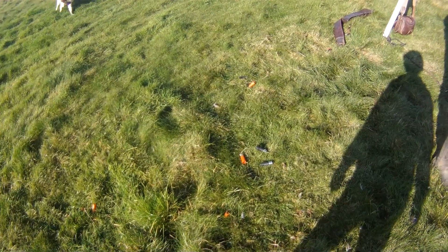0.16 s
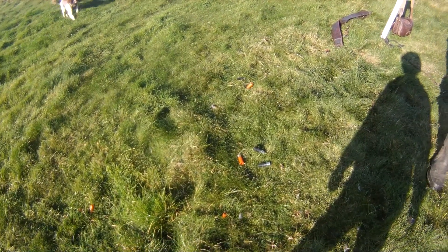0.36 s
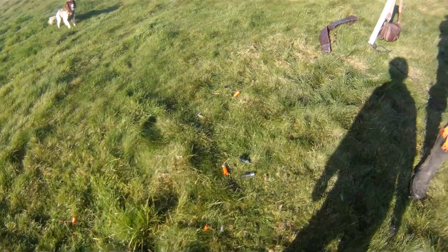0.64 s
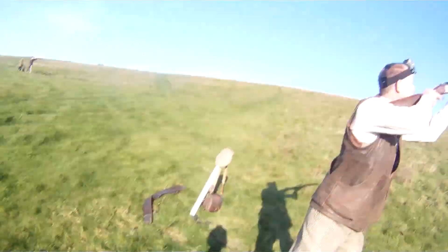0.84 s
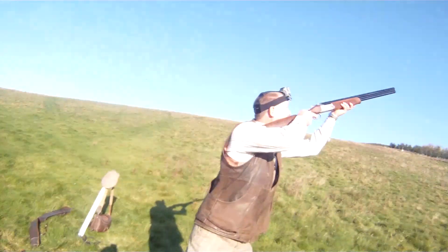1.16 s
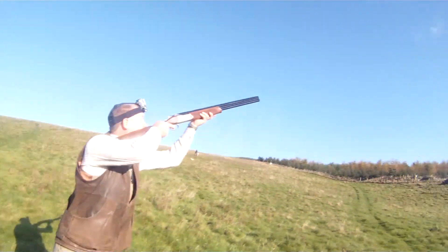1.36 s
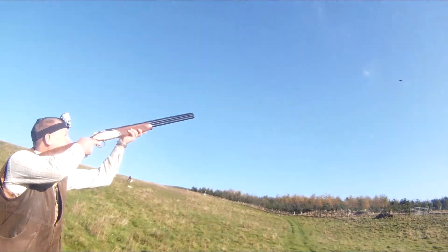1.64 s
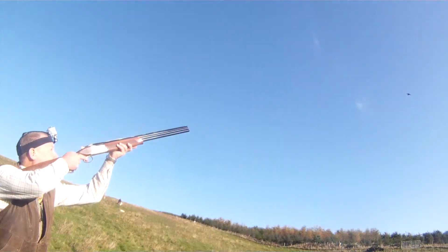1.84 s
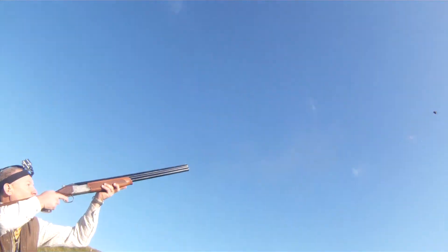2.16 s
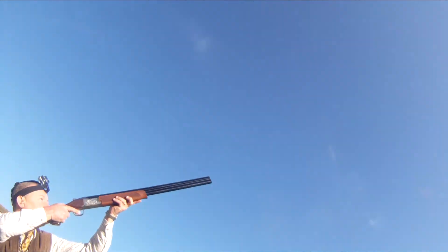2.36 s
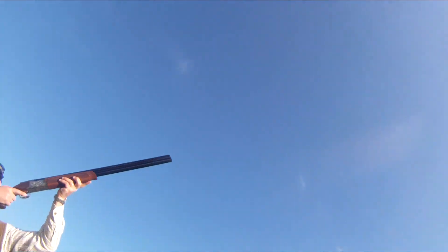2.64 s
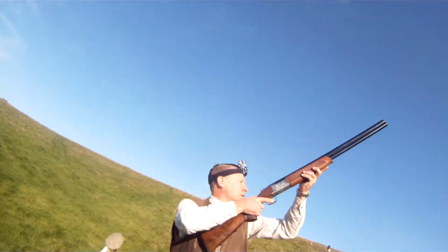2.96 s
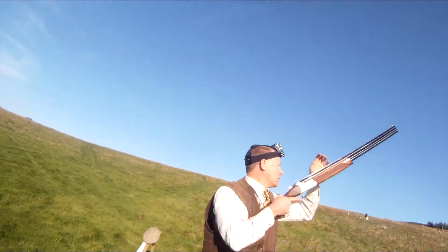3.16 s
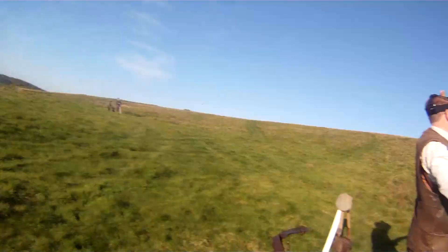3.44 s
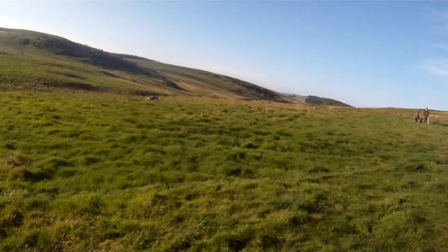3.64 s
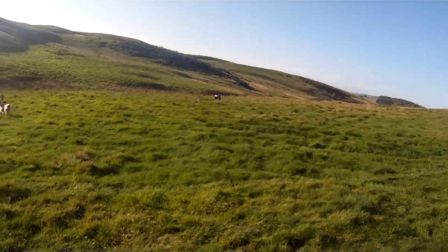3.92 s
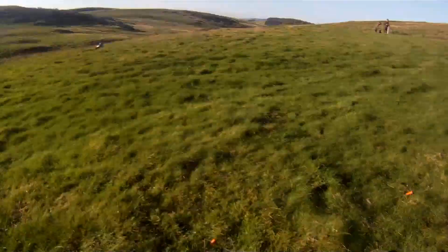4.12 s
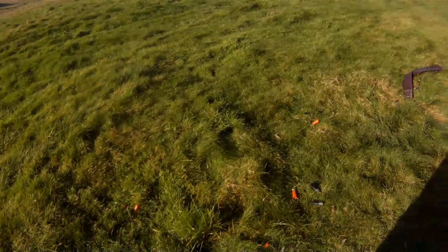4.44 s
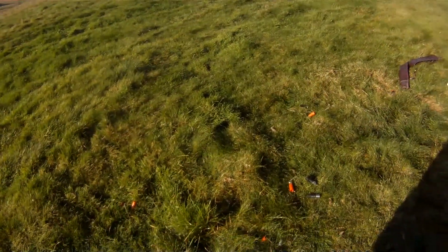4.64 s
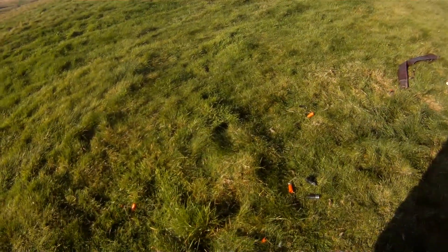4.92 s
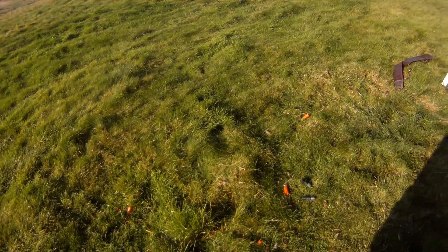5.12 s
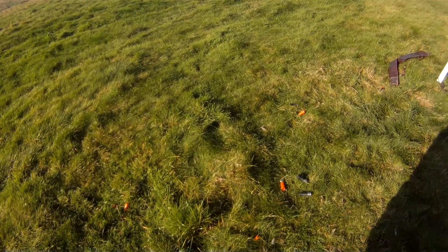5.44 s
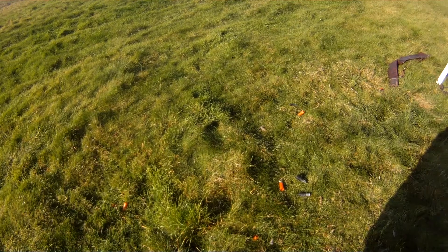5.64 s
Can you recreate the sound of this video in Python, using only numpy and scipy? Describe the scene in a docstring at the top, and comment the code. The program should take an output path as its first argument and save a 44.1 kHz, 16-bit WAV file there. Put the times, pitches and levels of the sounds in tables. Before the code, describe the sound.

Close shotgun fire outdoors: one crack, then two in quick succession, with a short ringing, rolling echo and small clicks afterwards.

```python
"""Shotgun cracks on an open grassy hillside, heard by a small hand-held camera beside the shooter.
Each blast rings the camera's housing and overloads its microphone; slopes scatter back a grainy roll.
Light wind bumps the microphone, clothes rustle, small things click, air whistles faintly, a bird chirps.
The recorder's 12 kHz sample-and-hold adds a glassy top."""
import sys
import numpy as np
from scipy import signal
from scipy.fft import rfft, irfft, next_fast_len
from scipy.io import wavfile

SR = 44100
rng = np.random.default_rng(int(sys.argv[2]) if len(sys.argv) > 2 else 0)


def wav_out(sig):
    """Save sig, one row per channel (or a flat mono array), as 16-bit PCM at SR to the path in sys.argv[1]."""
    wavfile.write(sys.argv[1], SR, np.round(np.clip(np.atleast_2d(sig).T, -1, 1) * 32767).astype(np.int16))


N = 254811
TIME = np.arange(N) / SR
AGE = np.arange(8192) / SR  # s since onset

# blasts: t/s, level/dB, focus f/Hz, bounce lag/ms, bounce/dB re level, gas/dB re level, gas length/ms,
# thump/dB, bark/dB, tail/dB, tail decay/ms
SHOTS = [(0.9739, 6.5, 1474, 1.347, 2.5, -15.5, 2.6, -35, -8.5, -31.5, 19.6),
         (1.7146, 4, 2130, 2.49, -3.5, -19.5, 1.53, -28.5, -24, -40.5, 34.4),
         (1.919, 14, 1150, 2.2, -3, -16, 3, -19, -11, -32.5, 40),
         (1.9449, 7.5, 2042, 1.50, 2.5, -2.5, 3.7, -29.5, -2, -24, 12.3)]
# housing modes: f/Hz, level/dB, t60/s
HOUSING_MODES = [(1230, -12, 0.018), (1366, -10.5, 0.011), (1740, -2, .012), (2020, -1.5, 0.012),
                 (2354, 3.5, .014), (2910, -8, 0.023), (3090, -14, .016), (3490, -6, 0.012),
                 (4300, -14, .009), (5320, -17, .009)]


def undb(db):
    """Decibels to gain."""
    return 10 ** (np.asarray(db) / 20)


def add(out, t_s, sound):
    """Mix sound in at t_s."""
    i = int(t_s * SR)
    out[i:i + len(sound)] += sound[:N - i]


def colour(x, spectrum):
    """Shape x by (f/Hz, level/dB) points; rms 1."""
    hz, db = np.transpose(spectrum)
    size = next_fast_len(len(x))
    bins_hz = np.maximum(np.fft.rfftfreq(size, 1 / SR), 1)
    gain = undb(np.interp(np.log(bins_hz), np.log(hz), db))
    y = irfft(rfft(x, size) * gain, size)[:len(x)]
    return y / np.std(y)


def burst(spectrum, decay_ms):
    """Coloured noise: instant onset, exponential decay."""
    return colour(rng.standard_normal(len(AGE)), spectrum) * np.exp(-1000 * AGE / decay_ms)


def grains(spectrum, rate_hz, spread_db):
    """Noise in short packets of uneven size; rms 1."""
    knots = rng.standard_normal(N)
    size_db = spread_db * np.interp(TIME * rate_hz, np.arange(N), knots)
    return colour(rng.standard_normal(N) * undb(size_db), spectrum)


def resonance(x, hz, width_hz):
    """Band-pass, unity gain at centre."""
    return signal.lfilter(*signal.iirpeak(hz, hz / width_hz, fs=SR), x)


def envelope(start_s, hold_s, rise_s, fall_s):
    """Exponential rise until start_s, hold, exponential fall."""
    age = TIME - start_s
    return np.exp(np.minimum(age, 0) / rise_s - np.maximum(age - hold_s, 0) / fall_s)


def swells(rows):
    """Gaussian gain bumps from (centre t/s, half length/s, level/dB)."""
    return sum(undb(db) * np.exp(-((TIME - t_s) / half_s) ** 2) for t_s, half_s, db in rows)


def breeze(wind_db=-1, calm_db=-66, swing_db=-58.5, hiss_db=-62):
    """Calm air, the camera's swing and gusts buffet the microphone over a faint hiss."""
    # gusts: centre t/s, half length/s, level/dB
    gusts = [(.6, .06, -49), (1.27, 0.16, -53.5), (2.17, 0.084, -50.5), (2.775, 0.032, -50),
             (3.31, 0.039, -53), (4.085, .05, -48.5)]
    # buffet spectrum: f/Hz, level/dB
    wind_spectrum = [(7.1, -28.5), (12, 0.5), (49, -2.5), (65, -7), (97, -17), (177, -22.5), (220, -25.5),
                     (300, -23.5), (390, -53.5), (660, -120)]
    # air hiss spectrum: f/Hz, level/dB
    air_spectrum = [(18, -30.5), (30, -4.5), (57, -2.5), (86, -10.5), (128, -5), (252, -10.5), (321, -11.5),
                    (708, -16.5), (2170, -20), (2700, -21.5), (3520, -24), (4480, -24.5), (5700, -29),
                    (7410, -64.5), (12500, -120)]
    swing = undb(swing_db) * envelope(start_s=0.58, hold_s=3.45, rise_s=0.082, fall_s=0.082)
    flow = np.sqrt(undb(calm_db) ** 2 + swing ** 2 + swells(gusts) ** 2)
    buffets = undb(wind_db) * flow * grains(wind_spectrum, rate_hz=22, spread_db=2)
    return buffets + undb(hiss_db) * grains(air_spectrum, rate_hz=27, spread_db=1.15)


def clothes(trim_db=-1):
    """Cloth rubs with each movement."""
    # movements: t/s, hold/s, level/dB
    moves = [(0.603, 0.15, -49), (3.279, 0.081, -60), (3.687, 0.042, -60.5), (3.897, .005, -62),
             (5.662, 0.068, -56.5)]
    # cloth spectrum: f/Hz, level/dB
    spectrum = [(180, -54), (300, -13), (388, -17.5), (673, -24), (698, -11.5), (789, -15), (860, -18.5),
                (1130, -8), (1290, -9.5), (2050, -2), (2560, -13.5), (3040, -16), (3740, -11), (4170, -31),
                (5600, -30), (7280, -65), (12300, -120)]
    motion = sum(undb(db) * envelope(t_s, hold_s, rise_s=.035, fall_s=.04) for t_s, hold_s, db in moves)
    return undb(trim_db) * motion * grains(spectrum, rate_hz=400, spread_db=3)


def housing():
    """Impulse response of the housing round the microphone; peak 1."""
    hz, db, t60_s = np.transpose(HOUSING_MODES)[:, :, None]
    modes = undb(db) * np.cos(2 * np.pi * hz * AGE) * np.exp(-np.log(1000) * AGE / t60_s)
    ring = modes.sum(axis=0)
    return ring / np.abs(ring).max()


def scuffs(hollow_hz=2360, hollow_db=8, damped_hz=1150):
    """Fingers scuff the housing; touch favours its hollow's main resonance and damps the lowest mode."""
    # touches: t/s, peak/dB, contact/ms
    touches = [(0.6665, -49, 1.1), (0.7361, -35, 0.96), (0.7683, -45.5, 1.8), (5.7074, -28, 0.024),
               (5.7095, -32.5, 1.2), (5.7337, -43.5, 0.81)]
    out = np.zeros(N)
    for t_s, db, contact_ms in touches:
        rub = rng.standard_normal(len(AGE)) * np.exp(-1000 * AGE / contact_ms)
        ring = signal.fftconvolve(rub, housing())
        hollow = undb(hollow_db) * resonance(ring, hollow_hz, width_hz=120)
        ring = ring + hollow - resonance(ring, damped_hz, width_hz=300)
        add(out, t_s, undb(db) * ring / np.abs(ring).max())
    return out


def clicks():
    """Small hard things click brightly nearby."""
    # contacts: t/s, level/dB, decay/ms
    contacts = [(0.742, -42, 4.7), (2.73, -51.5, 3.6), (3.9883, -32, 2.4), (3.995, -44, 10.7),
                (4.023, -51.5, 6.8), (5.667, -53.5, 3.7)]
    # click spectrum: f/Hz, level/dB
    spectrum = [(290, -45), (500, -73), (645, -47), (1110, -6), (1470, -15), (1880, 5), (2940, -19),
                (3160, -15), (3680, -3), (4700, 4), (5700, -1), (7410, -45), (12500, -120)]
    out = np.zeros(N)
    for t_s, db, decay_ms in contacts:
        add(out, t_s, undb(db) * burst(spectrum, decay_ms))
    return out


def muzzle_gas(length_ms):
    """Turbulent gas: swells briefly, stops short."""
    # turbulence spectrum: f/Hz, level/dB
    spectrum = [(120, -48), (200, -20.5), (602, -18.5), (865, -21), (1100, -12.5), (1430, -11.5),
                (2360, -5.5), (2640, -5.5), (3120, -6.5), (3390, -12.5), (3740, -4), (4010, -10),
                (5600, -20), (7280, -50.5), (12300, -120)]
    u = AGE * 1000 / length_ms
    return colour(rng.standard_normal(len(AGE)), spectrum) * 2 * u * np.exp(-u ** 2)


def shots(thump_s=.0015, bark_hz=560, bark_s=0.0017, focus_db=2, null_hz=950):
    """Shock front and bounce ring the housing over a thump and a bark; gas and a ringing tail follow."""
    # tail spectrum: f/Hz, level/dB
    tail_spectrum = [(120, -45.5), (200, -21), (326, -11.5), (682, -21.5), (1140, -3.5), (1300, -17.5),
                     (1410, -7.5), (2020, -8), (2360, -0.5), (2600, -10.5), (3210, -7), (3440, -13),
                     (4180, -19.5), (4670, -11.5), (5600, -22), (7280, -50.5), (12300, -120)]
    out, low, body = np.zeros(N), np.zeros(N), housing()
    thump = (1 - AGE / thump_s) * np.exp(-AGE / thump_s)  # overpressure, then longer, weaker suction
    bark = -np.cos(2 * np.pi * bark_hz * AGE) * np.exp(-AGE / bark_s)
    for t_s, db, hz, lag_ms, bounce_db, gas_db, gas_ms, thump_db, bark_db, tail_db, tail_ms in SHOTS:
        # each blast drives one band of the housing hardest
        ring = undb(db) * (body + undb(focus_db) * resonance(body, hz, width_hz=420))
        add(out, t_s, ring)
        add(out, t_s + lag_ms / 1000, undb(bounce_db) * ring)
        add(low, t_s, undb(thump_db) * thump + undb(bark_db) * bark)
        add(out, t_s, undb(db + gas_db) * muzzle_gas(gas_ms))
        add(out, t_s, undb(tail_db) * burst(tail_spectrum, tail_ms))
    # anti-resonance below the first mode hollows the cracks
    return out - resonance(out, null_hz, width_hz=260) + low


def hills(echo_db=-4, roll_db=-0.5, ring_db=-4, onset_s=0.00035):
    """Near banks return separate small cracks; far slopes blur into a grainy roll."""
    # slope returns: t/s, level/dB, rise/s, decay/s
    rolls = [(1.018, -47, 0.0092, 0.019), (1.062, -47.5, 0.0072, 0.074), (1.172, -50, 0.024, .16),
             (1.62, -60.5, .09, .14), (2.088, -46.5, 0.083, 0.081), (2.18, -48.5, 0.011, 0.28),
             (2.605, -55.5, 0.018, 0.054), (2.88, -66, .12, 0.32)]
    # bank echoes: t/s, level/dB, decay/ms
    echoes = [(0.992, -33, 2.2), (1.0563, -34, 2.6), (1.0633, -31, 2.8), (1.0718, -32, 2.6),
              (1.083, -31.5, 3.1), (1.1095, -41, 2), (1.1228, -37.5, 2.8), (1.169, -36, 5.6),
              (1.8283, -39.5, 6.8), (1.8592, -45, 6.6), (2.0553, -33.5, 3.2), (2.0829, -31, 3.7),
              (2.167, -32.5, 7.7), (2.211, -34.5, 3), (2.3689, -34, 2.7)]
    # return spectra, before and after the second shot: f/Hz, level/dB
    spectra = [
        [(290, -43.5), (500, -14), (576, -23), (637, -11), (881, -11.5), (1120, -5), (1390, -3), (1520, -10.5),
         (1630, 0), (2170, -6.5), (2350, -3.5), (2600, -12.5), (3550, -9.5), (4050, -18), (5600, -20),
         (7280, -56), (12300, -120)],
        [(290, -51), (500, -24.5), (606, -12.5), (812, -22), (1160, -5), (1500, -9.5), (2020, -1.5),
         (2190, -7.5), (2350, -7.5), (2790, -11), (2960, -16), (3630, -9.5), (4180, -24.5), (4760, -17.5),
         (5600, -26), (7280, -58.5), (12300, -120)],
    ]
    second_shot_s = SHOTS[1][0]
    out, powers = np.zeros(N), np.zeros((2, N))
    for t_s, db, rise_s, decay_s in rolls:
        roll = undb(db + roll_db) * envelope(t_s, 0, rise_s, decay_s)
        powers[int(t_s > second_shot_s)] += roll ** 2
    for power, spectrum in zip(powers, spectra):
        out += np.sqrt(power) * grains(spectrum, rate_hz=260, spread_db=2.5)
    onset = 1 - np.exp(-AGE / onset_s)
    for t_s, db, decay_ms in echoes:
        spectrum = spectra[int(t_s > second_shot_s)]
        add(out, t_s, undb(db + echo_db) * onset * burst(spectrum, decay_ms))
    # returns keep the housing modes ringing
    ring = sum(undb(db) * resonance(out, hz, width_hz=70) for hz, db, _ in HOUSING_MODES)
    return out + undb(ring_db) * ring


def whistle(hz=2780, width_hz=190):
    """Faint airy whistles: narrow-band noise swells and fades."""
    # whistles: centre t/s, half length/s, level/dB
    whistles = [(1.354, 0.105, -63.5), (4.677, 0.054, -70)]
    band = resonance(rng.standard_normal(N), hz, width_hz)
    band = resonance(band, hz, width_hz)
    return band / np.std(band) * swells(whistles)


def bird():
    """A far bird: short rising sine chirps."""
    # chirps: t/s, length/s, start f/Hz, end f/Hz, level/dB
    chirps = [(4.298, 0.075, 4320, 4400, -75), (4.889, 0.1, 4300, 4450, -75),
              (5.101, 0.0777, 4350, 4480, -78), (5.22, .06, 4550, 4600, -77)]
    out = np.zeros(N)
    for t_s, length_s, start_hz, end_hz, db in chirps:
        hz = np.linspace(start_hz, end_hz, int(length_s * SR))
        phase = 2 * np.pi * np.cumsum(hz) / SR
        add(out, t_s, undb(db) * np.hanning(len(hz)) * np.sin(phase))
    return out


def stereo_side(wind_db=-16, hiss_db=-75, turbulence_db=-19):
    """Side signal: a little independent wind, hiss and gas turbulence."""
    side = undb(wind_db) * breeze() + undb(hiss_db) * rng.standard_normal(N)
    for t_s, db, _, _, _, gas_db, gas_ms, *_ in SHOTS:
        add(side, t_s, undb(db + gas_db + turbulence_db) * muzzle_gas(gas_ms))
    return side


def scene():
    """Mid/side mix, nearly mono."""
    mid = shots() + hills() + clothes() + scuffs() + clicks() + whistle() + bird() + breeze()
    side = stereo_side()
    return np.array([mid + side, mid - side])


def record(dry, ceiling=0.99, bass_hz=300, antialias_hz=5800, top_hz=15400):
    """Microphone overloads above the bass; 12 kHz sample-and-hold mirrors the band about 6 and 12 kHz."""
    excess = dry - ceiling * np.tanh(dry / ceiling)
    highpass = signal.butter(2, bass_hz, "high", fs=SR, output="sos")
    clipped = dry - signal.sosfiltfilt(highpass, excess)
    antialias = signal.firwin(161, antialias_hz, fs=SR)
    band = signal.fftconvolve(clipped, antialias[None], mode="same")
    samples_12k = signal.resample_poly(band, 160, 147, axis=1)[:, ::4]
    held_48k = np.repeat(samples_12k, 4, axis=1)
    held = signal.resample_poly(held_48k, 147, 160, axis=1)[:, :N]
    lowpass = signal.ellip(10, .1, 60, top_hz, fs=SR, output="sos")
    return signal.sosfiltfilt(lowpass, np.clip(held, -.97, .97))


dry = scene()
out = record(dry)
wav_out(out)
```